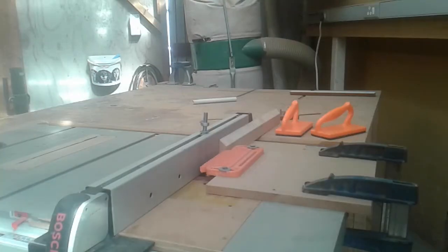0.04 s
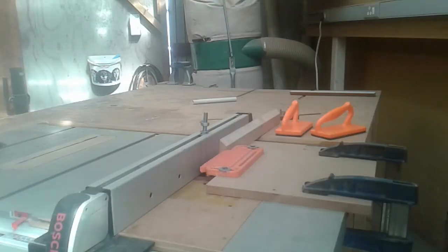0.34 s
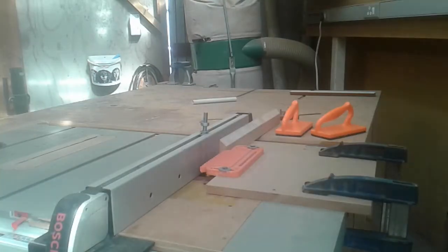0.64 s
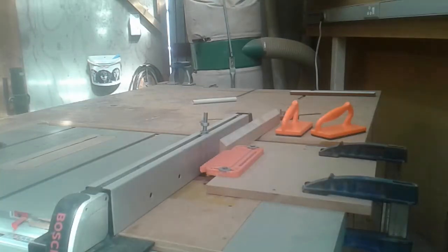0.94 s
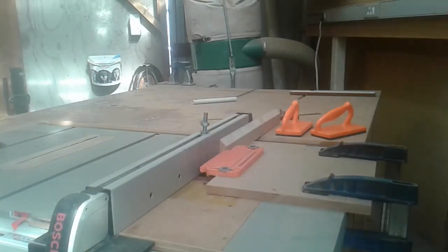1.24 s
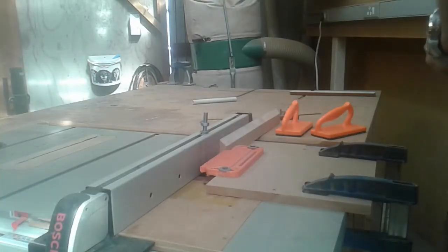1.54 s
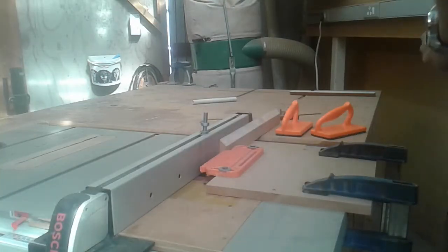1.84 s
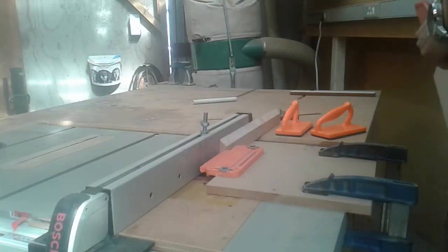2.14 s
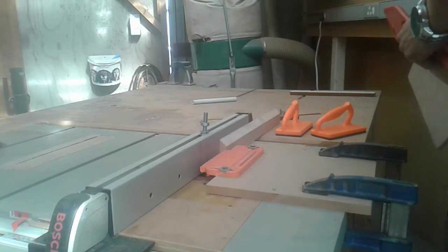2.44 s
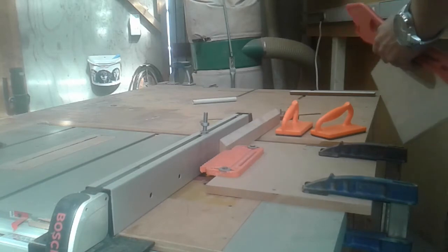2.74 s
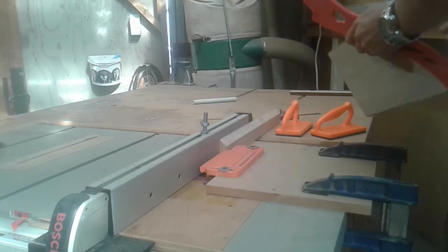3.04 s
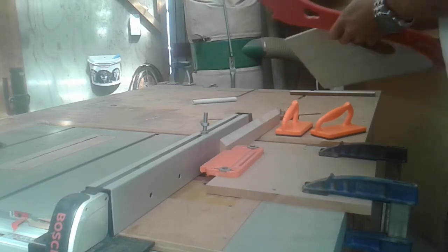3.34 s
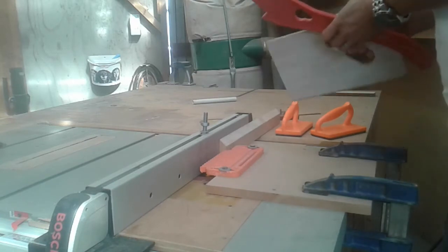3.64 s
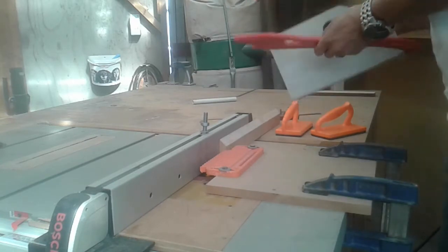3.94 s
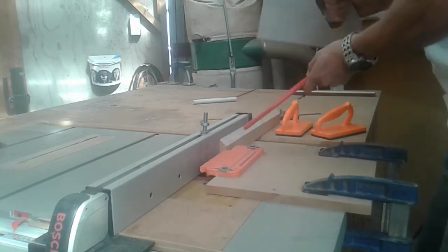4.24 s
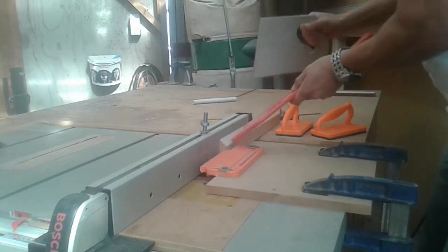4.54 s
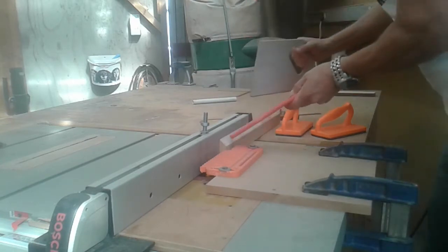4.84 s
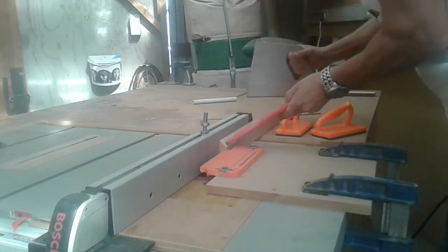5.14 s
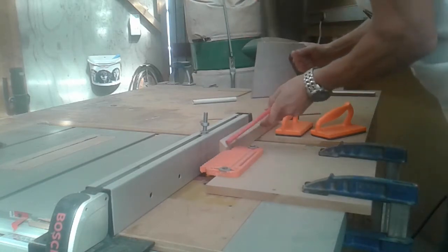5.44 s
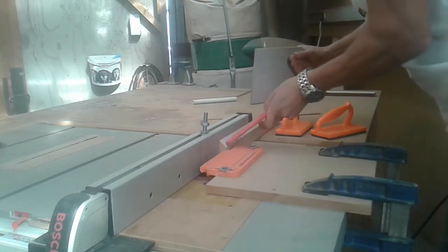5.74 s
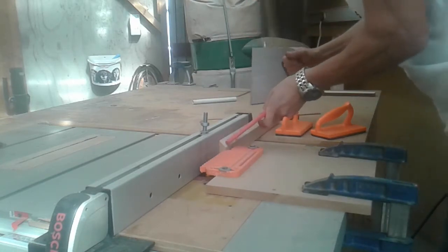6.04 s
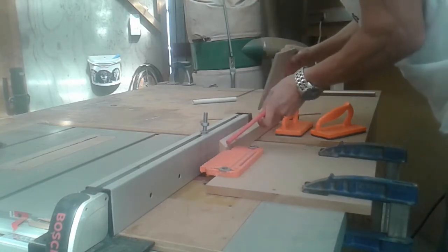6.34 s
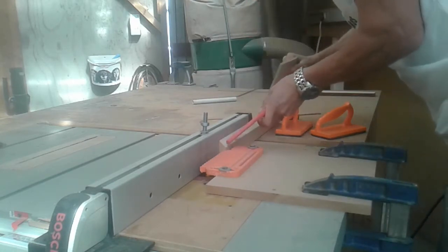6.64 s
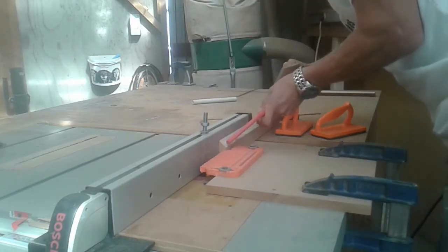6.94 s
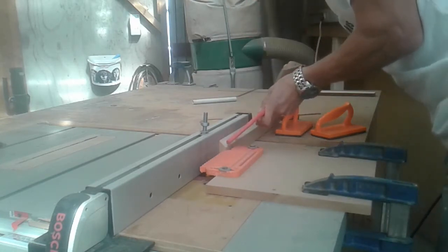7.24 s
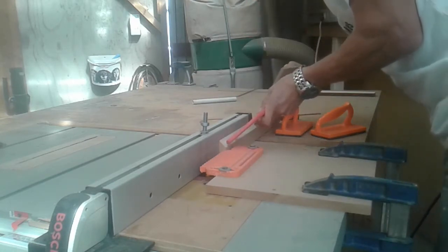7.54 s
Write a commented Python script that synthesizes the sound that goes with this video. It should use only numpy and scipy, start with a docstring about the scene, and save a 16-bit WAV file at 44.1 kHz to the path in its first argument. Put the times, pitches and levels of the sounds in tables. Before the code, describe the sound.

In a small, quiet workshop, a few light knocks on wood sound among faint steps and scuffs. A switch snaps sharply, and a table-mounted router starts with a brief growl. It spins up quickly to a high whine with singing bearings and rushing air, dips slightly in pitch, recovers and keeps running. The microphone is close, with little room echo.

```python
"""A table-mounted router starts up in a small workshop, heard in mono from one microphone, near enough
that the direct sound outweighs the room. Soft steps, scuffs and knocks on wood come first, then the switch.
The starting current makes the table growl; the motor spins up to about 25,000 rpm, sags and settles.
Its two-flute cutter whines, the bearings sing and cooling air rushes through the ringing cabinet.
Tones swell and fade at the microphone as their pitch slides through standing waves."""
import sys
import numpy as np
from scipy import signal
from scipy.fft import rfft, irfft
from scipy.io import wavfile
from scipy.ndimage import uniform_filter1d

SR = 44100
rng = np.random.default_rng(int(sys.argv[2]) if len(sys.argv) > 2 else 0)


def master(y):
    """Save y as 16-bit WAV."""
    cut = np.clip(np.atleast_2d(y).T, -1, 1)
    pcm = np.round(cut * 32767)  # scale
    wavfile.write(sys.argv[1], SR, pcm.astype(np.int16))


N = 343098
TIME = np.arange(N) / SR
FREQ = np.maximum(np.arange(N // 2 + 1) * SR / N, 1)

# room tone of the still workshop: frequency_hz, relative_db
ROOM_TONE_SPECTRUM = [(15, -38), (25, -22), (50, -19), (349, -10), (433, -11.5), (762, -14), (826, -17),
                      (1050, -15), (15500, -32)]
# soft footfalls: start_s, level_db, t60_s
FOOTFALLS = [(.351, -54, 0.079), (0.564, -52, 0.084), (.824, -57, 0.12), (1.118, -60, .08),
             (1.185, -62, .12), (1.225, -65, .08), (1.795, -57, 0.18), (2.375, -60, 0.11)]
# thud of a footfall: frequency_hz, relative_db
FOOTFALL_SPECTRUM = [(40, -32), (110, -5), (280, -4), (600, -7), (1200, -16), (3000, -35), (15000, -60)]
# scuffs of shoes and sleeves: peak_s, level_db, rise_s, fall_s, tilt_db_per_octave
SCUFFS = [(.065, -64, 0.0092, .03, 1), (.30, -60.5, 0.072, 0.027, 5.5), (.80, -55, 0.035, 0.026, 1.5),
          (1.19, -58, .045, 0.045, -1), (1.32, -63.5, 0.031, .03, 0.5), (1.41, -59.5, 0.047, .06, -1),
          (1.77, -59.5, 0.0089, 0.043, 1), (2.018, -63.5, .004, 0.04, 2.5),
          (2.18, -59.5, 0.024, 0.052, 3.5), (2.378, -47.5, 0.0052, 0.033, 4)]
# rub of a scuff: frequency_hz, relative_db
SCUFF_SPECTRUM = [(60, 1), (300, -3), (900, 3), (2200, -4), (3500, -6), (6200, -7.5), (9000, -21),
                  (15000, -29)]
# knocks on wood: start_s, level_db, tilt_db_per_octave, t60_s, pitch_hz
KNOCKS = [(0.205, -36.5, 0, 0.063, 2060), (.270, -49, -8, .07, 590), (.350, -59, -7, .05, 330),
          (0.8196, -35.5, 2.5, 0.043, 1480), (1.182, -56, -7, .04, 900), (1.408, -55, -4, .04, 950),
          (1.445, -49, -4.5, 0.083, 514), (1.759, -58, 7, .04, 1500), (2.015, -56, 8, .04, 2200)]
# body of a knock: frequency_hz, relative_db
KNOCK_SPECTRUM = [(59, -62), (100, -31), (443, -12), (674, 0.5), (1630, -16.5), (2050, -10.5), (2690, -20),
                  (4260, -16), (4940, -24), (15000, -50)]
# ring of the knocked wood: centre_hz, width_hz, lift_db
WOOD_RESONANCES = [(690, 150, -1), (900, 80, 7), (1680, 90, 10), (2000, 110, 6.5), (4220, 250, 2)]
# snap of the power switch: start_s, level_db, t60_s
SWITCH_SNAP = (2.462, -20.5, 0.016)
# colour of that snap: frequency_hz, relative_db
SWITCH_SPECTRUM = [(40, -35), (110, -17), (250, -17), (450, -17), (750, -2), (1400, -7), (2400, -2.5),
                   (3400, 1.5), (4600, -5.5), (6000, -3.5), (8500, -13), (15500, -14)]
# sparking of the brushes as the rotor breaks loose: start_s, level_db, t60_s
SPARK_BURST = (2.708, -41, .5)
# modes of the table that the motor's torque shakes: pitch_hz, relative_db, t60_s
TABLE_MODES = [(219, -13, 0.27), (303, 5, 0.084), (431, 5, 0.076), (510, 3, 0.14), (856, 3.5, .04),
               (2320, -2, 0.043)]
# cooling air: frequency_hz, relative_db
AIR_SPECTRUM = [(40, -73), (90, -62), (140, -22.5), (210, -17.5), (290, -2), (370, -13), (550, -5.5),
                (1000, -2.5), (1900, -12), (3000, -3), (6200, 0.5), (8000, -10), (10500, -16.5),
                (15500, -19.5)]
# resonances of motor housing and cabinet: centre_hz, width_hz, lift_db
CABINET_RESONANCES = [(214.4, 43, 13.5), (411, 17, 8.5), (580, 114, 6.5), (701, 35, 8.5), (820, 80, 10),
                      (897, 55, 2), (1088, 42, 7.5), (1240, 58, 12.5), (1333, 46, 12.5), (1459, 173, 10),
                      (1599, 91, 9), (1865, 274, 14), (2219, 272, 14.5), (2530, 374, 8.5), (3174, 99, 6.5),
                      (3900, 840, 4.5), (4905, 160, 4), (8640, 110, 1)]
# standing waves at the microphone: centre_hz, width_hz, lift_db
STANDING_WAVES = [(304.7, 8.3, 5.7), (314.1, 2.5, -10.9), (792.5, 19, 7.8), (805.5, 6.5, -11.8),
                  (816.8, 6.5, 5), (821.8, 2.4, -7.2), (826.6, 1, 1.6), (921, 16, 6), (1566, 24, -9),
                  (1604, 10, 4), (1636, 16, -3), (2410, 16, 5), (2456, 10, 6), (2484, 27, -12.5)]
# bearing tones, relative levels at three speeds: shaft_multiple, sagging_db, recovering_db, full_speed_db
BEARING_TONES = [(1.24, -54, -41, -38.5), (1.52, -47, -42, -46), (2.76, -36, -35.5, -34),
                 (3.04, -53, -46, -37.5), (3.24, -46, -43, -40), (3.52, -50, -42, -47),
                 (5.48, -45, -42, -34), (14.68, -53, -48, -47), (15.52, -53, -52, -46),
                 (17.33, -52, -54, -46), (19.59, -57, -55, -53), (20.15, -58, -55, -53),
                 (22.45, -62, -59, -57), (25.85, -66, -63, -59), (27.3, -66, -63, -60),
                 (33.48, -67, -62, -57.5)]
# those three shaft speeds: sagging_hz, recovering_hz, full_speed_hz
BEARING_SPEEDS_HZ = [391, 405, 414]
# partials of the bearings' squeal: shaft_multiple, relative_db
SQUEAL_PARTIALS = [(8.88, -6.5), (9.12, -3), (9.36, -5.5)]
# brief chirps of the bearings: peak_s, shaft_multiple, level_db
BEARING_CHIRPS = [(3.18, 9.12, -28), (3.27, 33.48, -48), (5.1, 9.36, -28), (5.91, 33.48, -44),
                  (6.07, 17.33, -38), (6.26, 33.48, -48), (6.3, 17.33, -37), (6.8, 9.12, -28)]
# shudder at the critical speed of the motor mount: speed_hz, width_hz, level_against_inrush_db
MOUNT_SHUDDER = (343, 51, -8.5)
# spin-up, sag and recovery of the shaft: time_s, speed_hz
SHAFT_SPEED = [(2.69, 0), (2.76, 170), (2.86, 295), (2.95, 368), (3.0, 388.0), (3.1, 408.8), (3.2, 410.6),
               (3.55, 400.2), (3.76, 391.4), (4.08, 390.1), (4.22, 394.1), (4.4, 396.4), (4.85, 405.8),
               (5.35, 412.9), (6.4, 414.0), (7.3, 416.0), (7.75, 414.9)]

ROOM_T60_LOW_S, ROOM_T60_HIGH_S = 0.31, 0.24
FULL_HZ, SAG_HZ = 415, 390  # shaft speed running freely and at the bottom of the sag
RIPPLE_HZ = 100  # the torque ripples at twice the mains rate


def undb(db):
    """Decibels to gain."""
    return 10 ** (np.asarray(db) / 20)


def unit(x):
    """Scale to rms 1."""
    return x / np.sqrt(np.mean(x ** 2))


def wander(rate_hz):
    """Random drift of rms 1: levels held for 1 / rate_hz seconds and smoothed twice."""
    size = int(SR / rate_hz)
    held = np.repeat(rng.standard_normal(1024), size)[:N]
    return unit(uniform_filter1d(uniform_filter1d(np.resize(held, N), size), size))


def lift(hz, peaks):
    """Gain in dB of a set of resonances or dips at these frequencies."""
    return sum(db / (1 + (2 * (hz - centre) / width) ** 2) for centre, width, db in peaks)


def response(points, peaks=(), tilt_db=0):
    """Gain over frequency, rms 1: a broad spectrum with resonances and a tilt per octave above 450 Hz."""
    hz, db = np.transpose(points)
    db = np.interp(np.log(FREQ), np.log(hz), db) + tilt_db * np.log2(np.maximum(FREQ, 450))
    return unit(undb(db + lift(FREQ, peaks)))


def noise(gain):
    """Steady noise with this gain over frequency."""
    return irfft(rfft(rng.standard_normal(N)) * gain, N)


def decay(start, t60):
    """Envelope of a blow: a millisecond of contact, then an even fall."""
    age = TIME - start
    return np.clip(age / .001, 0, 1) * undb(-60 * np.clip(age / t60, 0, 4))


def tone(phase, db, slip_rad=0., flicker_db=0.):
    """A partial whose phase slips and whose level flickers."""
    return np.sqrt(2) * undb(db + flicker_db * wander(14)) * np.sin(phase + slip_rad * wander(16))


def room(x, wet_db):
    """Direct sound at the microphone plus the short dense echo of the workshop; the treble dies first."""
    age = TIME[:SR // 2]
    scatter = rng.standard_normal(len(age))
    low = signal.sosfilt(signal.butter(1, 1200, fs=SR, output="sos"), scatter)
    tail = low * undb(-60 * age / ROOM_T60_LOW_S) + (scatter - low) * undb(-60 * age / ROOM_T60_HIGH_S)
    tail *= np.minimum(age / 0.0087, 1)
    echo = signal.fftconvolve(x, tail / np.linalg.norm(tail))[:N]
    wet = undb(wet_db)
    return (x + wet * echo) / np.sqrt(1 + wet ** 2)


def room_tone(level_db=-70.5):
    """The faint steady noise of the still workshop."""
    return undb(level_db) * noise(response(ROOM_TONE_SPECTRUM))


def footfalls():
    """Someone steps softly about the shop: dull thuds that die quickly."""
    thuds = sum(undb(db) * decay(start, t60) for start, db, t60 in FOOTFALLS)
    return thuds * noise(response(FOOTFALL_SPECTRUM))


def scuffs():
    """Shoes and sleeves rub in short swells of grainy noise."""
    out = np.zeros(N)
    grain = undb(3.2 * wander(130))
    for peak, db, rise, fall, tilt_db in SCUFFS:
        from_peak = np.maximum((peak - TIME) / rise, (TIME - peak) / fall)
        swell = np.exp(-np.minimum(from_peak, 20))
        out += undb(db) * swell * grain * noise(response(SCUFF_SPECTRUM, tilt_db=tilt_db))
    return out


def knocks():
    """Light blows ring the wood, each struck spot with a note of its own."""
    out = np.zeros(N)
    for start, db, tilt_db, t60, pitch_hz in KNOCKS:
        ring = response(KNOCK_SPECTRUM, [*WOOD_RESONANCES, (pitch_hz, 0.15 * pitch_hz, 10)], tilt_db)
        out += undb(db) * decay(start, t60) * noise(ring)
    return out


def switch(wash_db=-4):
    """A hard snap under the table; the workshop answers with an even wash whose treble dies first."""
    start, db, t60 = SWITCH_SNAP
    colour = response(SWITCH_SPECTRUM)
    bass = 1 / (1 + (FREQ / 1200) ** 2)
    snap = noise(colour) * decay(start, t60)
    wash = noise(colour * np.sqrt(bass)) * decay(start, ROOM_T60_LOW_S)
    wash += noise(colour * np.sqrt(1 - bass)) * decay(start, ROOM_T60_HIGH_S)
    return undb(db) * (snap + undb(wash_db) * wash)


def sparks():
    """An abrupt fizz from the brushes, pulsing twice each mains cycle, rings the motor housing."""
    start, db, t60 = SPARK_BURST
    buzz = 1 + .5 * np.cos(2 * np.pi * RIPPLE_HZ * TIME)
    fizz = noise(response(AIR_SPECTRUM, CABINET_RESONANCES, tilt_db=-2.5))
    return undb(db) * decay(start, t60) * buzz * fizz


def inrush(start_s=2.668, attack_s=0.08, hold_s=0.051, fall_db_per_s=240):
    """Starting current, 0 to 1: it comes on, holds while the rotor breaks loose, and dies away."""
    age = TIME - start_s
    release_s = np.maximum(age - attack_s - hold_s, 0)
    return np.clip(age / attack_s, 0, 1) ** 2 * undb(-fall_db_per_s * release_s)


def growl(strain, level_db=-24):
    """Each half wave of the starting current jerks the motor and rings the table, with no deep bass."""
    beats = np.arange(0, N, SR // RIPPLE_HZ)
    jerks = np.zeros(N)
    jerks[beats] = undb(3.5 * rng.standard_normal(len(beats)))
    jerks += 0.034 * rng.standard_normal(N)
    ring = sum(undb(db) * decay(0, t60) * np.sin(2 * np.pi * hz * TIME) for hz, db, t60 in TABLE_MODES)
    ring = signal.sosfilt(signal.butter(6, 175, "high", fs=SR, output="sos"), ring[:SR // 2])
    return unit(signal.fftconvolve(jerks, ring)[:N]) * strain * undb(level_db)


def cooling_air(angle, speed, sag, shudder, rush_db_per_octave=5, hiss_db_per_octave=8):
    """Turbulence in the cabinet grows louder and brighter with speed; flutes and ripple chop its treble."""
    octaves = np.log2(np.maximum(speed, .001) / FULL_HZ)
    rush_db = -21 + rush_db_per_octave * octaves - sag + 2.5 * shudder
    hiss_db = hiss_db_per_octave * octaves
    colour = response(AIR_SPECTRUM, CABINET_RESONANCES)
    top = 1 / (1 + (6500 / FREQ) ** 4)
    bass = 1 / (1 + (FREQ / 1700) ** 4)
    # three bands, each fluttering on its own
    body = noise(colour * np.sqrt(bass * (1 - top))) * undb(wander(22))
    edge = noise(colour * np.sqrt((1 - bass) * (1 - top))) * undb(hiss_db / 3 + 0.66 * wander(22))
    hiss = noise(colour * np.sqrt(top)) * undb(hiss_db + 0.78 * wander(12))
    chop = 1 + 0.13 * np.cos(2 * angle) + 0.067 * np.cos(2 * np.pi * RIPPLE_HZ * TIME)
    rush = signal.sosfilt(signal.butter(2, 85, "high", fs=SR, output="sos"), body + (edge + hiss) * chop)
    turning = TIME > SPARK_BURST[0]
    return room(turning * rush * undb(rush_db), wet_db=-6.5)


def chirps(angle, half_length_s=0.031):
    """Now and then a bearing tone flares up and fades again."""
    out = np.zeros(N)
    for peak, multiple, db in BEARING_CHIRPS:
        flare = np.exp(-((TIME - peak) / half_length_s) ** 2)
        out += flare * tone(multiple * angle, db, slip_rad=.4)
    return out


def bearings(angle, speed, sag, drone_multiple=.76, whistle_multiple=20.5):
    """Balls and cage run at fractions of the shaft speed and slip, so their inharmonic tones waver."""
    drone_db = -34 + lift(drone_multiple * speed, STANDING_WAVES)
    squeal_db = -31.5 - 1.5 * sag + 0.44 * wander(3.35)
    whistle_db = -43 - 5.5 * sag + 2 * wander(4.5)
    out = tone(drone_multiple * angle, drone_db, slip_rad=0.071, flicker_db=0.94)
    out += tone(whistle_multiple * angle, whistle_db, slip_rad=.7, flicker_db=2)
    for multiple, db in SQUEAL_PARTIALS:
        out += tone(multiple * angle, squeal_db + db, slip_rad=.3, flicker_db=1.8)
    for multiple, *levels_db in BEARING_TONES:
        swell_db = .7 * np.sqrt(multiple) * wander(6)  # higher tones swell and fade more
        db = np.interp(speed, BEARING_SPEEDS_HZ, levels_db) + swell_db - 1
        out += tone(multiple * angle, db, slip_rad=.04 * multiple, flicker_db=1.3)
    return out


def cutter(angle, speed, sag):
    """Two flutes beat the air at even multiples of the shaft speed; torque ripple adds side tones."""
    out = tone(2 * angle, -21.5 + lift(2 * speed, STANDING_WAVES), slip_rad=.04, flicker_db=0.4)
    out += tone(4 * angle, -29 + lift(4 * speed, STANDING_WAVES), slip_rad=.1, flicker_db=0.8)
    out += tone(6 * angle, -29.5 + lift(6 * speed, STANDING_WAVES), slip_rad=.1, flicker_db=3)
    ripple = 2 * np.pi * RIPPLE_HZ * TIME
    # the side tones swell as the motor sags
    swell_db = 14.5 * np.sin(sag * np.pi / 2) * np.minimum(speed / SAG_HZ, 1) ** 4
    upper_db = -45 + swell_db + lift(2 * speed + RIPPLE_HZ, STANDING_WAVES)
    # the ripple bends pitch more than loudness: its two side tones have opposite signs
    out += tone(2 * angle - ripple, -44 + swell_db, slip_rad=.15, flicker_db=2)
    out -= tone(2 * angle + ripple, upper_db, slip_rad=.15, flicker_db=2)
    for phase in (4 * angle - ripple, 4 * angle + ripple + np.pi, 6 * angle - ripple):
        out += tone(phase, -46.75 + swell_db / 2, slip_rad=0.33, flicker_db=4.2)
    return out


def router(sing_from_hz=225, sing_range_hz=130, standing_lag_s=0.014):
    """One shaft drives cutter, bearings and fan; it shudders as it starts and sings once up to speed."""
    speed = uniform_filter1d(np.interp(TIME, *np.transpose(SHAFT_SPEED)), SR // 50)
    lagged_speed = np.interp(TIME - standing_lag_s, TIME, speed)  # standing waves take a moment to build
    sag = np.clip((FULL_HZ - speed) / (FULL_HZ - SAG_HZ), 0, 1)  # 0 at full speed, 1 when slow
    critical_hz, width_hz, shudder_db = MOUNT_SHUDDER
    shudder = np.exp(-((np.maximum.accumulate(speed) - critical_hz) / width_hz) ** 4)
    strain = inrush() + undb(shudder_db) * shudder
    angle = 2 * np.pi * np.cumsum(speed) / SR + .25 * strain * wander(110)
    sputter = undb(5 * strain * wander(70))
    singing = np.clip((speed - sing_from_hz) / sing_range_hz, 0, 1)
    tones = cutter(angle, lagged_speed, sag) + bearings(angle, lagged_speed, sag) + chirps(angle)
    return singing * sputter * tones + cooling_air(angle, speed, sag, shudder) + growl(strain) + sparks()


def scene():
    """Router, person and workshop reach one microphone, the same in both channels."""
    mono = router() + room(knocks() + footfalls() + scuffs(), wet_db=-10) + switch() + room_tone()
    return np.array([mono, mono])


def record(dry):
    """The recorder cuts the top steeply above 15,750 Hz."""
    return signal.sosfilt(signal.ellip(10, .2, 80, 15750, fs=SR, output="sos"), dry)


dry = scene()
out = record(dry)
master(out)
```